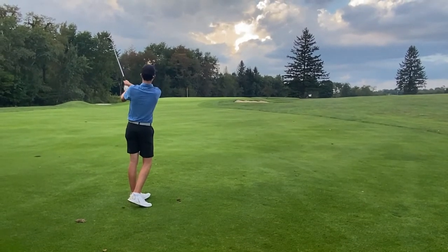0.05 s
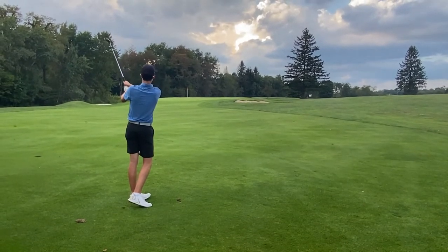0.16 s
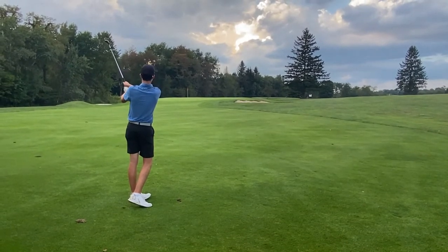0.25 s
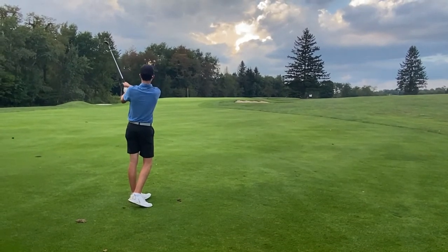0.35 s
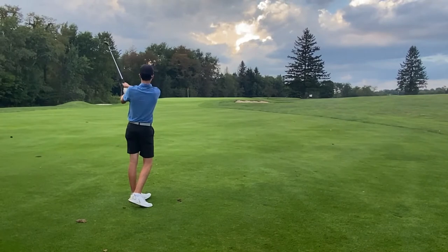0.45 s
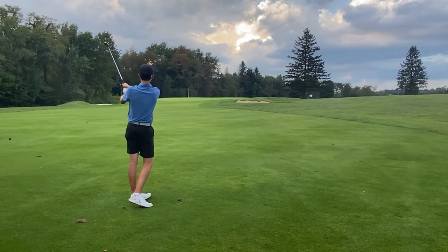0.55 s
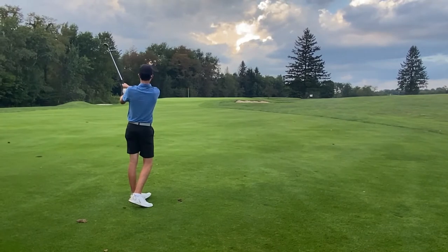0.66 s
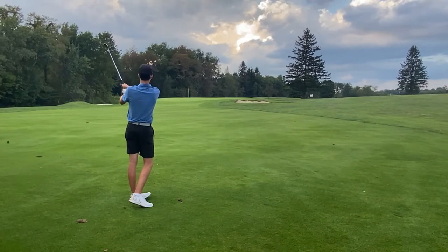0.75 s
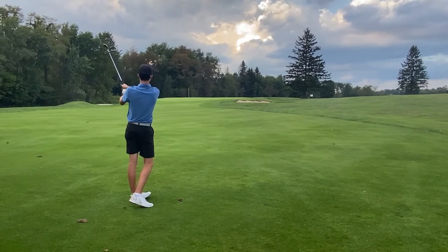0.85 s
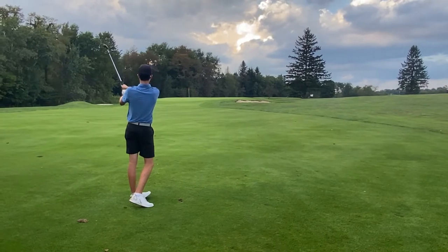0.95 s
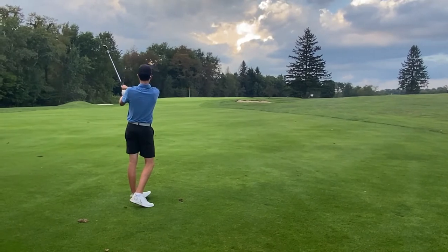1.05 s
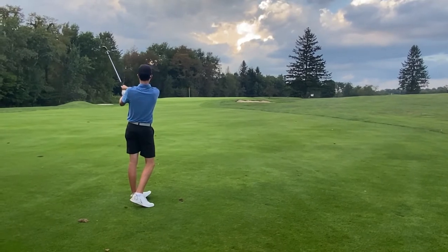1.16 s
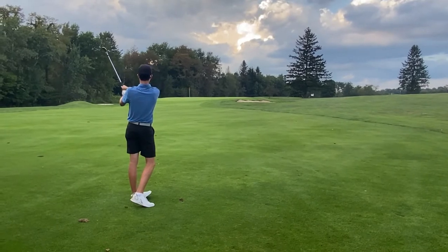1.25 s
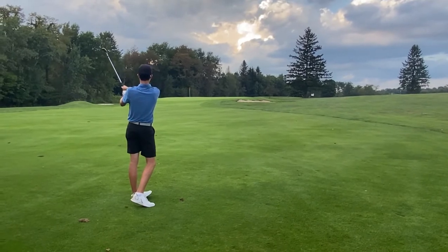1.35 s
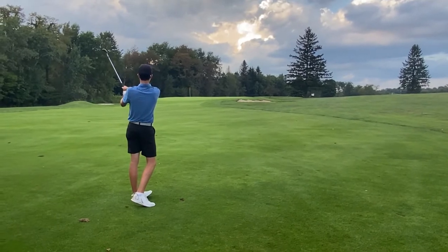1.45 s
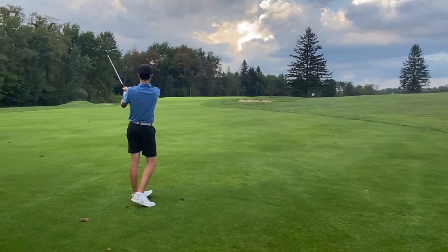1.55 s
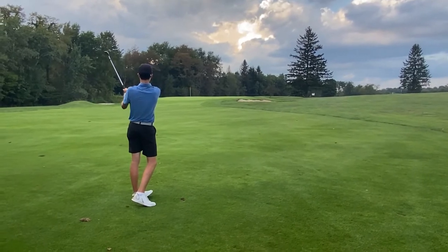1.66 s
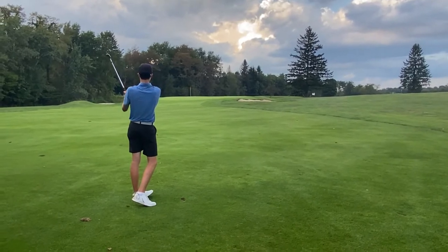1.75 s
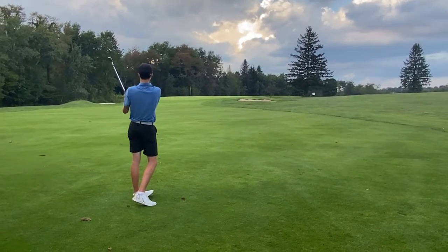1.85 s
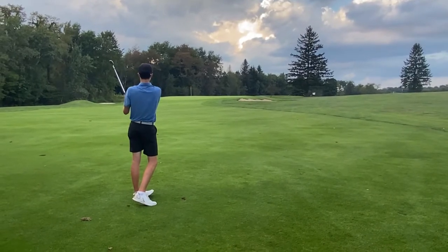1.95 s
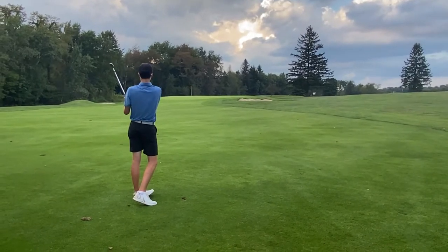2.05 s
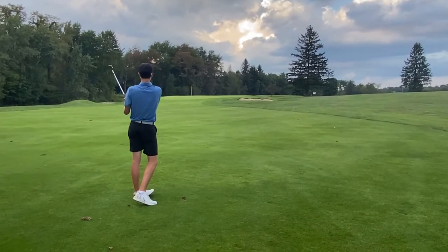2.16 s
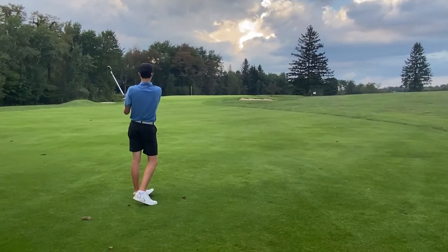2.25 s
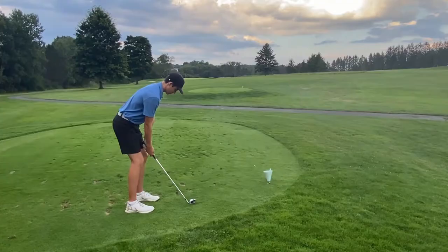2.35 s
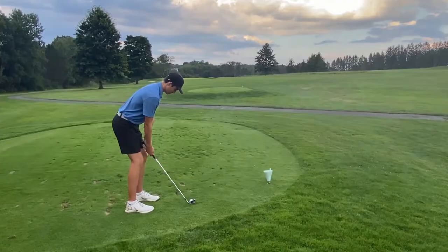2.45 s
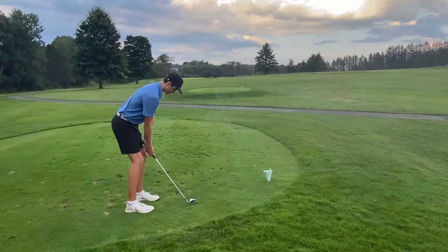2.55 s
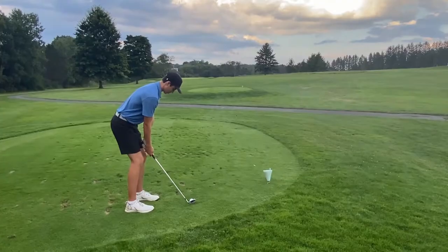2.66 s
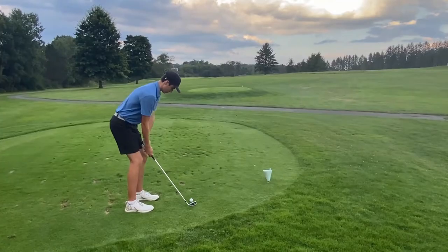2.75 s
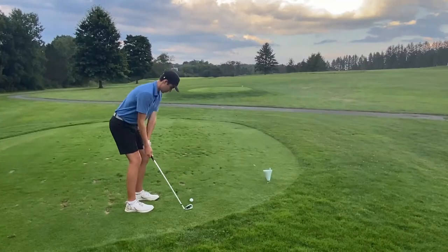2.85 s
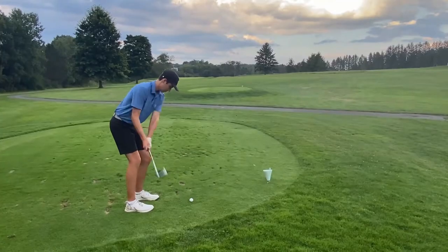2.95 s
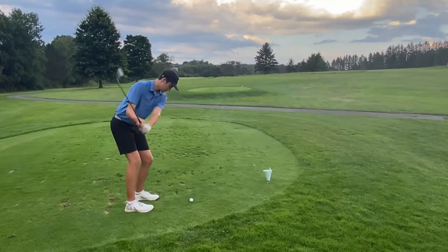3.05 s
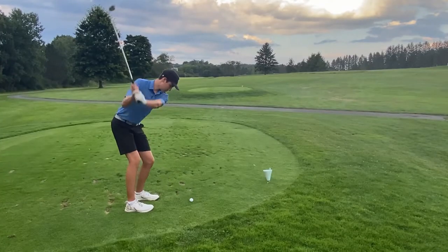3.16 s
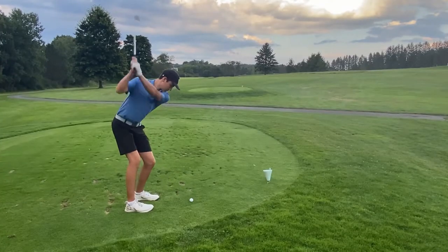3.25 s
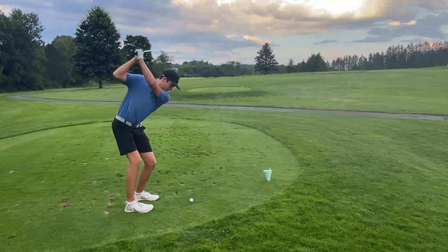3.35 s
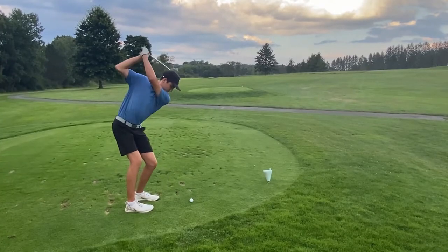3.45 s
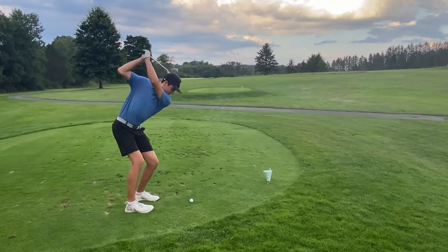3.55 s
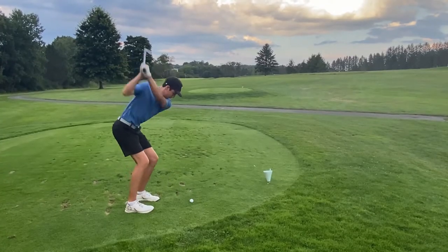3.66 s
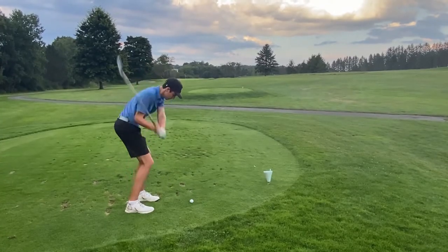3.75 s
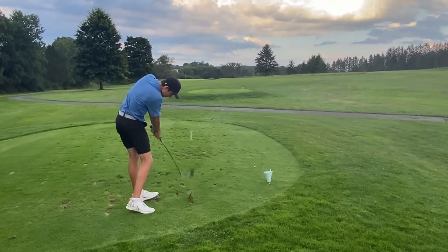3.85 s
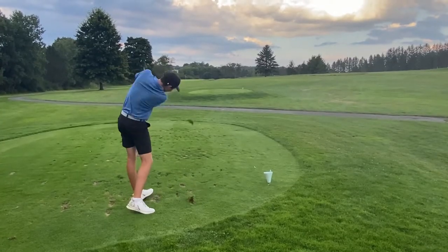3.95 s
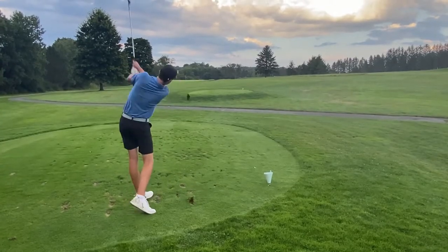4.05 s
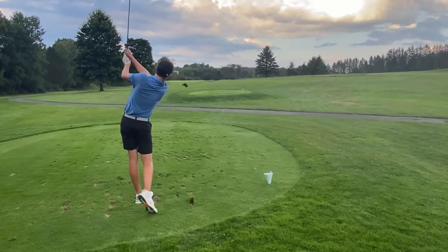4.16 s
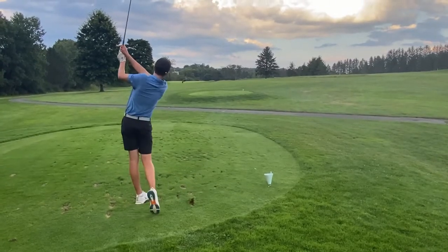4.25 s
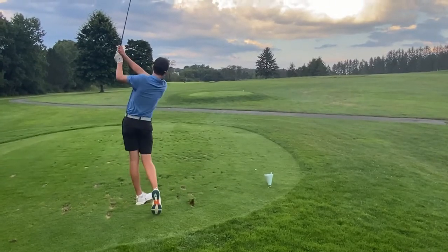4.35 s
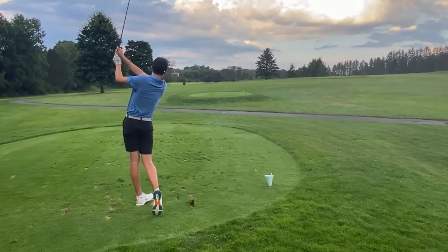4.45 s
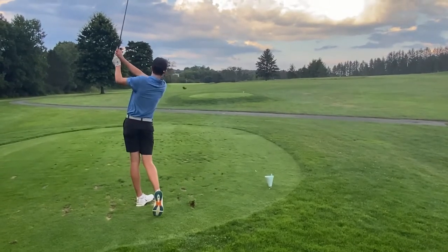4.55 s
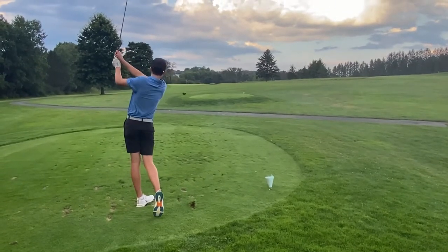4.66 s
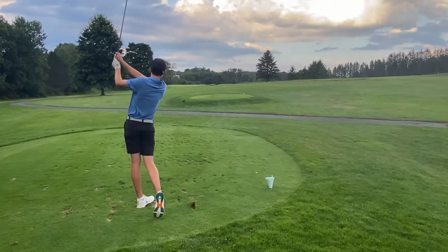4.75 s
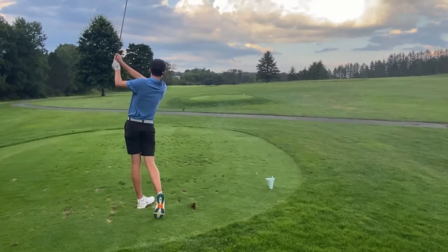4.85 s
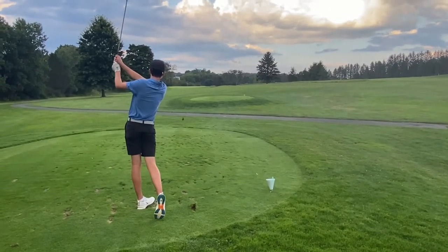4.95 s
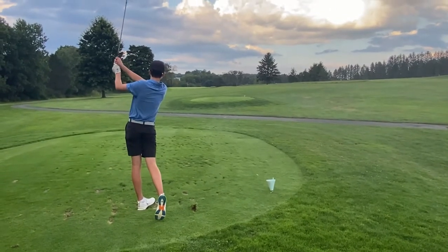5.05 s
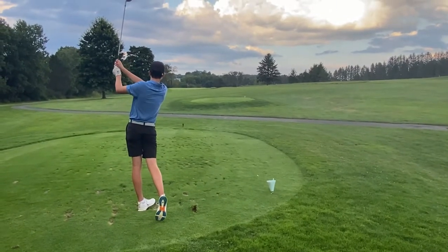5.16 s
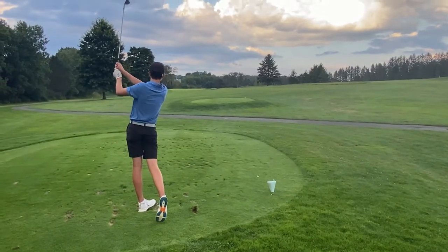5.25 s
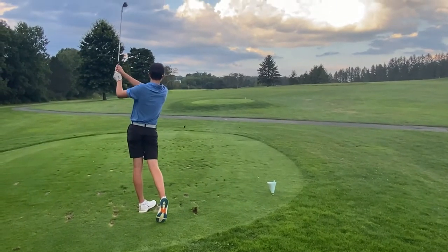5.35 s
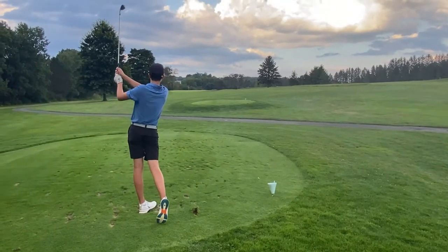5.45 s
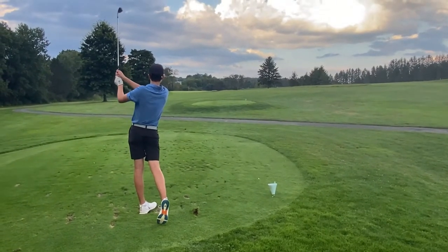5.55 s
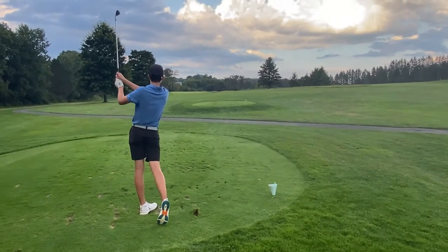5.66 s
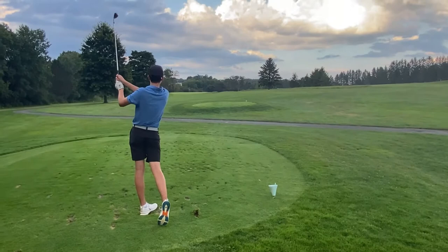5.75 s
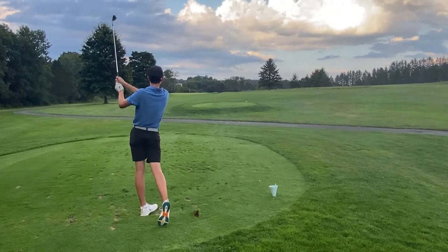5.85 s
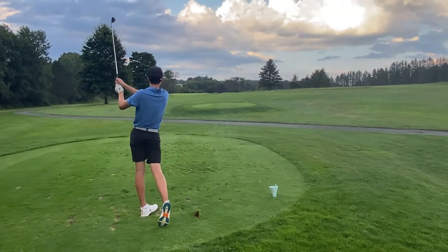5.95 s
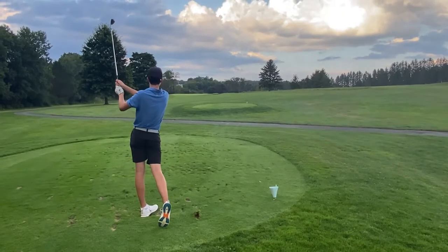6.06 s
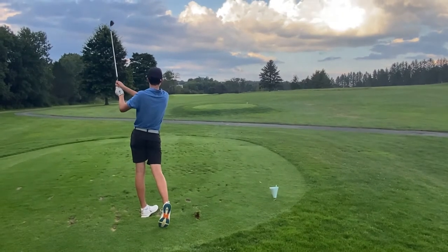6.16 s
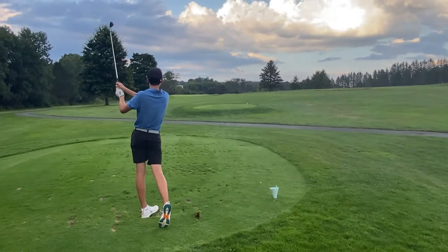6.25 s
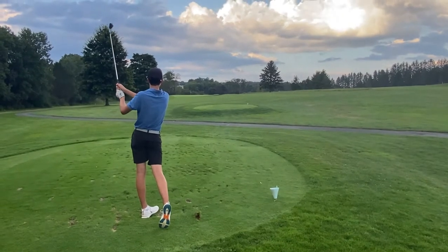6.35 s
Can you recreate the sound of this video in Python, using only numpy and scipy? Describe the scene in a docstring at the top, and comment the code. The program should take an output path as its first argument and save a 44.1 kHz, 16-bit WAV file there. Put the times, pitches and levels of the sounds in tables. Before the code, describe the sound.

Crickets chirp faintly on a golf course over a low rumble of far traffic, light breeze and a distant droning engine. The background dips for an instant and returns without the engine. Then a golf iron swishes down and hits a ball with one loud, sharp crack, and bits of soil patter briefly on the grass. The insects and rumble carry on, picked up in stereo by a phone near the golfer.

```python
"""A golf iron swishes down, cracks a ball and throws up turf whose soil patters on the grass. Swirling air
makes the swish; the blow sets ball and club ringing. This is the second of two moments at dusk, joined by a
short fade. In the first, a distant engine drones with its steady firing. Crickets chirp by rubbing their wings,
and far traffic, a breeze and an insect chorus fill both moments, and a phone with two microphones hears it all."""
import sys
import numpy as np
from scipy import signal
from scipy.fft import rfft, irfft, next_fast_len
from scipy.io import wavfile
from scipy.ndimage import uniform_filter1d

SR = 44100
rng = np.random.default_rng(int(sys.argv[2]) if len(sys.argv) > 2 else 0)


def store_wav(level_fs):
    """Save 16-bit WAV to argv[1]."""
    pcm = np.round(np.clip(np.atleast_2d(level_fs), -1, 1) * 32767)
    wavfile.write(sys.argv[1], SR, pcm.T.astype(np.int16))


N = 282681
TIME = np.arange(N) / SR
SIZE = next_fast_len(N + 4096)
FREQ = np.maximum(np.fft.rfftfreq(SIZE, 1 / SR), 1.)
JOIN_S, STRIKE_S = 2.417, 3.90545  # the fairway gives way to the tee; the club meets the ball


def undb(db):
    """Turn a level in dB into a gain."""
    return 10 ** (np.asarray(db) / 20)


def unit(x):
    """Scale a sound to an average power of 1."""
    return x / np.sqrt(np.mean(x ** 2))


def curves(table):
    """Join a table's points with straight lines in time, one curve per column."""
    times, *columns = np.transpose(table)
    return [np.interp(TIME, times, c) for c in columns]


def over_hz(table, column=1):
    """Join a table's points smoothly from low to high frequency."""
    return np.interp(np.log(FREQ), np.log([r[0] for r in table]), [r[column] for r in table])


def shape(x, gain):
    """Filter a sound with one gain per frequency."""
    return irfft(rfft(x, SIZE) * gain, SIZE)[..., :N]


def walk(rate):
    """A smooth random wobble, about 1 in size, with rate new values a second."""
    hold = int(SR / rate)
    steps = np.repeat(rng.standard_normal(N // hold + 1), hold)
    return 1.3 * uniform_filter1d(uniform_filter1d(steps, hold), hold)[:N]


def sine(hz):
    """A pure tone that follows a changing pitch."""
    return np.sin(2 * np.pi * np.cumsum(hz) / SR)


def bump(at_s, width_s):
    """A bell-shaped swell in time, 1 at its top."""
    return np.exp(-.5 * ((TIME - at_s) / width_s) ** 2)


def decay(age, ring_s):
    """A level that falls by 60 dB every ring_s seconds."""
    return np.exp(-np.log(1000) * age / ring_s)


def wide_noise():
    """Spectra of left and right noise, alike in the bass and unrelated in the treble."""
    # how the two sides compare: f/Hz, likeness/0-1, left minus right/dB
    width = [(61, 1, 0.5), (200.2, 1, 0), (406, 0.4, 2), (700, 0, 6), (1300, 0, 2), (4410, 0.03, 0.5),
             (7905, .05, -1)]
    mid, side = rfft(rng.standard_normal((2, N)), SIZE)
    like, pan_db = np.clip(over_hz(width), 0, .95), over_hz(width, column=2)
    mid, side = mid * np.sqrt((1 + like) / 2), side * np.sqrt((1 - like) / 2)
    return np.array([(mid + side) * undb(pan_db / 2), (mid - side) * undb(-pan_db / 2)])


def place(x, pan_db, lag):
    """Send a sound to both microphones; the left gets it pan_db louder and lag samples later."""
    left = shape(x, np.exp(-2j * np.pi * FREQ * lag / SR))
    return np.array([left * undb(pan_db / 2), x * undb(-pan_db / 2)])


def traffic_and_breeze():
    """Far traffic and breeze blur into noise; rumble and roar swell apart, and each octave flickers."""
    # tone colour of the background at the fairway and at the tee: f/Hz, relative level/dB
    fairway_colour = [(15, -46), (25, -9.5), (72, -4), (102, -12), (120, -12.5), (146, -14), (196, -15),
                      (333, -27.5), (510, -34), (763, -36.5), (1670, -43), (4000, -51.5), (5200, -84),
                      (8800, -120)]
    tee_colour = [(15, -39), (25, -12.5), (60, 0), (131, 1.5), (173, -11), (232, -6.5), (294, -17),
                  (355, -17), (421, -25.5), (560, -27), (720, -24), (850, -28.5), (1030, -25), (1250, -31),
                  (1780, -37), (4000, -46.5), (5200, -82.5), (8800, -120)]
    # slow swells: t/s, rumble/dB, road roar/dB
    swells = [(0.0, 2, 4.5), (0.8, 3.5, 3.5), (1.9, 2, 6), (2.15, 7.5, 4), (2.46, 0, 6.5), (2.7, 1, 2),
              (3.75, 2, 3.5), (4.0, 5.5, 12), (4.35, 4, 6), (4.68, 6.5, 4), (4.9, 1, 4.5), (5.22, -1.5, 5),
              (5.48, -2.5, 8), (5.78, 0, 7), (6.02, 0, 8), (6.22, -1, 7.5), (6.41, 0, 8)]
    rumble_db, roar_db = curves(swells)
    noise, out = wide_noise(), 0
    for hz in 31.25 * 2. ** np.arange(8):
        octave = noise * np.cos(np.pi / 2 * np.clip(np.log2(FREQ / hz), -1, 1)) ** 2
        fairway = irfft(octave * undb(over_hz(fairway_colour) - 28.5), SIZE)[:, :N]
        tee = irfft(octave * undb(over_hz(tee_colour) - 33), SIZE)[:, :N]
        swell_db = rumble_db if hz < 300 else roar_db if hz < 1500 else 0
        out += np.where(TIME > JOIN_S, tee, fairway) * undb(swell_db + 1.5 * walk(8.7))
    return out


def engine():
    """Tones at multiples of the firing rate waver on their long way through the air."""
    # the engine's run: t/s, firing rate/Hz, level/dB
    firing = [(0.0, 91.7, -51.5), (0.45, 92.3, -49), (0.7, 92.65, -44), (0.95, 95.4, -46.5),
              (2.15, 95.2, -49.5), (2.41, 95.3, -61)]
    # its tones: multiple of the firing rate, relative level/dB
    harmonics = [(1, -0.5), (2, -12), (3, -23.5), (4, -29), (5, -33.5)]
    # a second, rougher drone above it: t/s, f/Hz, level/dB
    second_drone = [(0.0, 126, -56.5), (0.3, 123, -62.5), (0.6, 124, -59.5), (0.85, 126, -69.5),
                    (1.3, 130, -64), (1.9, 130, -63), (2.25, 131, -56), (2.4, 131, -60)]
    hz, db = curves(firing)
    cycles = np.cumsum(hz * (1 + .0028 * walk(11.67))) / SR
    tone = 0
    for k, tone_db in harmonics:
        waver_db = (1.8 if k == 1 else 4) * walk(5.74)
        tone += undb(tone_db + waver_db) * np.sin(2 * np.pi * (k * cycles + rng.random()))
    drone_hz, drone_db = curves(second_drone)
    drone = undb(drone_db + 4 * walk(8.1)) * sine(drone_hz * (1 + .0157 * walk(15)))
    return place(np.sqrt(2) * (tone * undb(db) + drone) * (TIME < JOIN_S), pan_db=-1.4, lag=-45)


def insect_chorus():
    """Many far insects blur into bands of hiss that trill and drift."""
    # edges of each band: low f/Hz, high f/Hz
    edges = [(3280, 3500), (4540, 4850), (4900, 5400), (5400, 5850), (6200, 6800), (6800, 7100),
             (7100, 7550), (4250, 8050), (9600, 12400)]
    # each band's sound: fairway level/dB, tee level/dB, trill rate/Hz, trill depth/0-1
    voices = [(-98.5, -104, 8, 0.5), (-78, -87, 33, 0.2), (-85, -82, 66, .25), (-84.5, -81.5, 68, 0.07),
              (-100.5, -86.5, 27, .2), (-99, -86.5, 48, 0.1), (-91.5, -91, 59, 0.1),
              (-88.5, -86.5, 20, .05), (-95.5, -94, 39.2, .1)]
    noise, out = wide_noise(), 0
    for (low_hz, high_hz), (fairway_db, tee_db, rate, depth) in zip(edges, voices):
        band = 1 / np.sqrt((1 + np.minimum(low_hz / FREQ, 9) ** 60) * (1 + (FREQ / high_hz) ** 60))
        hiss = unit(irfft(noise * band, SIZE)[:, :N])
        trill = 1 + depth * sine(rate * (1 + .067 * walk(4.7)))
        out += hiss * trill * undb(np.where(TIME > JOIN_S, tee_db, fairway_db) + .94 * walk(5.1))
    return out


def crickets():
    """Each wing stroke is a short raspy tone that falls in pitch; no two strokes are quite alike."""
    # single insects: f/Hz, level/dB, stroke rate/Hz, sounding share of a stroke/0-1,
    # pitch fall in a stroke/Hz, left minus right/dB, relative level as a call starts/dB
    singers = [(2370, -86, 48.5, 1, 30, 2., -3), (5270, -73.5, 24.8, .42, 250, 0., -4),
               (6950, -92, 24.15, .45, 200, -2., 0), (6480, -79.5, 13.38, .35, 600, -1., 0),
               (4550, -83, 62, 1, 350, 0., -5), (2670, -89, 67, .9, 240, 1., -3),
               (2970, -94, 55, .9, 200, 1., -5), (2190, -89.5, 48, 1, 70, 1., -4),
               (3330, -92.5, 60, .9, 350, 1., -5), (2870, -93, 60, .9, 350, 1., 0)]
    # one list of calls per insect: start t/s, length/s
    songs = [
        [(0., .045), (.312, .11), (.672, .165), (1.115, .11), (1.465, .175), (1.915, .095), (2.255, .155)],
        [(s, .12) for s in (.147, .42, .735, 1.148, 1.528, 1.797, 2.09)],
        [(.017, 2.39)],
        [(2.468, 1.9), (4.391, 2.02)],
        [(s, .115) for s in (2.465, 4.67, 5.2, 5.76)],
        [(2.57, .2), (2.8, .39), (3.23, .11)],
        [(2.85, .22), (3.39, .12)],
        [(3.59, .16)],
        [(5.63, .2)],
        [(4.51, .07), (4.67, .05), (4.77, .14), (4.99, .12)],
    ]
    swell_s, jitter_s, spread_db = .045, .002, 1.4
    out, rasp = np.zeros((2, N)), .3 * walk(640)
    uneven_time = TIME + jitter_s * walk(40)
    for (hz, db, rate, share, fall_hz, pan_db, start_db), calls in zip(singers, songs):
        for start, length in calls:
            call = slice(int(start * SR), min(int((start + length) * SR), N))
            stroke, progress = np.divmod(np.maximum(uneven_time[call] - start, 0) * rate, 1)
            strength, phase = rng.standard_normal((2, 99))[:, stroke.astype(int)]
            progress = np.minimum(progress / share, 1)
            cycles = np.cumsum(hz + fall_hz * (.5 - progress + rasp[call])) / SR + .1 * phase
            swell_db = start_db * np.exp(-stroke / rate / swell_s)
            arch = np.sin(np.pi * progress).clip(0) ** .6
            tone = undb(db + swell_db + spread_db * strength) * arch * np.sin(2 * np.pi * cycles)
            out[:, call] += 2 * tone * undb([[pan_db / 2], [-pan_db / 2]])
    # grass and leaves scatter the tones, which blurs and roughens the strokes
    scatter = rng.standard_normal((2, 4096)) * decay(TIME[:4096], ring_s=.045)
    scatter /= np.sqrt(np.sum(scatter ** 2, axis=1, keepdims=True))
    return out + undb(-10) * shape(out, rfft(scatter, SIZE))


def rustle():
    """A faint, uneven, very high hiss comes and goes before the swing."""
    treble = wide_noise() / (1 + (10500 / FREQ) ** 12) / (1 + (FREQ / 15000) ** 40)
    hiss = unit(irfft(treble, SIZE)[:, :N])
    return hiss * bump(at_s=3.338, width_s=.1) * undb(-90 + 2 * walk(40))


def swing():
    """Air swirls off the club with a rush; faster swirls sound higher, and the shaft sings briefly."""
    # the club head's flight: t/s, speed/(m/s), level of the rush/dB
    flight = [(3.75, 18.6, -83), (3.815, 28.7, -70.5), (3.835, 33, -59.5), (3.855, 33, -49),
              (3.874, 33, -41), (3.892, 39.5, -43), (3.905, 47, -40.5), (3.96, 30, -62.5), (4.1, 24, -71)]
    # rough tones in the rush: multiple of the swirl rate, relative level/dB
    swirl_tones = [(1, 4), (2, -2), (3.7, -6.5)]
    speed, rush_db = curves(flight)
    shaft_m = .012
    swirl_hz = .2 * speed / shaft_m  # one swirl for every five shaft widths travelled
    colour = (FREQ / 500) / (1 + (FREQ / 500) ** 2) ** .95 / (1 + (FREQ / 7000) ** 2)
    rush = unit(shape(rng.standard_normal(N), colour))
    singing = sine(swirl_hz * (1 + .03 * walk(120))) * undb(-31 + 1.5 * walk(70))
    singing *= bump(at_s=3.89, width_s=.0065)
    rush += undb(-3) * sum(undb(db) * walk(250) * sine(k * swirl_hz) for k, db in swirl_tones)
    # a thin falling whistle as the club comes down
    whistle_s, whistle_hz, fall_hz_per_s = 3.79, 3520, 7000
    t = TIME - whistle_s
    whistle = np.sin(2 * np.pi * (whistle_hz - fall_hz_per_s * t / 2) * t)
    whistle *= undb(-81 + 5 * walk(150)) * bump(whistle_s, width_s=.04)
    moving = (TIME > flight[0][0]) & (TIME < flight[-1][0])
    return place(moving * (rush * undb(rush_db) + singing) + whistle, pan_db=3, lag=-5)


def strike():
    """A hard blow rings ball and club with a crack; a weaker, duller echo bounces off the ground."""
    # ringing tones of the blow: f/Hz, relative level/dB, time to fall 60 dB/s
    tones = [(62, -31, .2), (110.17, -19, 0.051), (173, -14, 0.057), (348, -14, 0.023), (560, -18, 0.022),
             (1073.3, -9.5, 0.018), (1480, -14, 0.013), (1975, -4, 0.014), (2760, -13, 0.011),
             (3480, -6.5, .011), (3900, -6.5, .01), (4220, -6.5, 0.012), (4600, -8, 0.011),
             (5350, -14, .008), (6200, -13, 0.006), (7070, -9, .007), (7450, -9, .006), (7800, -12, 0.006),
             (9450, -10, 0.005), (11500, -7, 0.004), (13000, -4, 0.0035), (14400, -6, 0.0035),
             (15200, -15, .003), (785, -25, .02)]

    def ring(age):
        return sum((-1) ** k * undb(db) * decay(age, ring_s) * np.sin(2 * np.pi * hz * age)
                   for k, (hz, db, ring_s) in enumerate(tones))

    def crack(age):
        return rng.standard_normal(N) * decay(age, ring_s=.018) * (age > 0)

    ball_age = np.maximum(TIME - STRIKE_S, 0)
    echo_age = np.maximum(ball_age - .0025, 0)
    ball = ring(ball_age) + undb(-11.5) * crack(ball_age)
    dull_ring = shape(ring(echo_age), 1 / (1 + (FREQ / 3500) ** 2))
    ground_echo = undb(-13) * dull_ring + undb(-17) * crack(echo_age)
    blow = undb(-2.5) * (ball + ground_echo)
    thud = shape(blow, 1 / (1 + (FREQ / 450) ** 4))
    treble = shape(blow, 1 / (1 + (5500 / FREQ) ** 14))
    # the left microphone hears the body of the blow first, but its treble late and flipped, round the phone
    body = place(thud, pan_db=-.4, lag=-3.7) + place(blow - treble - thud, pan_db=1.7, lag=-3.7)
    return body + place(treble, pan_db=-.5, lag=10.2) * [[-1], [1]]


def divot():
    """Torn turf and soil land as tiny clicks spread over the grass; each shower rises, then dies away."""
    # showers of soil: start t/s, peak level/dB, rise time/s
    showers = [(3.906, -51, 0.009), (3.93, -46.5, 0.0069), (3.95, -60.5, 0.0343), (4.02, -57.5, 0.053),
               (4.11, -67.5, 0.1)]
    # tone colour of the patter: f/Hz, relative level/dB
    soil = [(400, -24.5), (1000, -6.5), (2680, -3.5), (3580, -9), (4360, -5), (5440, -14.5), (6940, -4.5),
            (9060, -20), (11300, -14.5), (16000, -23.5)]
    power = 0
    for start, db, rise_s in showers:
        age = np.maximum(TIME - start, 0) / rise_s
        power += (undb(db) * age * np.exp(1 - age)) ** 2
    thinning_s, spread_db = .15, 2.2
    grains_per_s = 1630 + 7300 * np.exp(-np.maximum(TIME - STRIKE_S, 0) / thinning_s)
    chance, size, sign = rng.random((3, 2, N))
    strength = undb(-spread_db * np.log(size + 1e-9)) / np.sqrt(grains_per_s)
    grains = (chance < grains_per_s / SR) * strength * np.sign(sign - .5)
    # bigger crumbs land one by one within a second, each with a short pitch of its own
    crumbs, t = np.zeros((2, N)), TIME[:512]
    low_hz, high_hz = 600, 7500
    for delay_s, pitch, weight, pan in rng.random((800, 4)):
        hz = low_hz * (high_hz / low_hz) ** pitch
        age = t * hz / 12  # a crumb dies away in about 12 cycles
        tick = (.3 + weight) * np.sqrt(hz) * age * np.exp(-8 * age) * np.sin(2 * np.pi * hz * t)
        first = int((STRIKE_S + delay_s) * SR)
        crumbs[:, first:first + len(t)] += np.outer([pan, 1 - pan], tick)
    colour = undb(over_hz(soil))
    patter = unit(shape(grains, colour)) + undb(-5) * unit(shape(crumbs, colour)) / np.sqrt(N / SR)
    return np.sqrt(power) * patter


def scene():
    """Add up all sources; the background fades out and back in between the two moments."""
    fade_s = .032
    fade = np.clip(np.abs(TIME - JOIN_S) / fade_s, 0, 1) ** 1.8
    background = traffic_and_breeze() + engine() + insect_chorus() + crickets() + rustle()
    return fade * background + swing() + strike() + divot()


def record(dry):
    """The phone delays the bass, drops the deepest rumble, rounds the loudest peak and cuts the top."""
    lag_s, bass_hz, rumble_hz, top_hz, ceiling = .0072, 306, 30, 15900, .95
    late_bass = np.exp(-2j * np.pi * lag_s * bass_hz * np.log(1 + FREQ / bass_hz))
    filtered = shape(dry, late_bass / np.sqrt(1 + (rumble_hz / FREQ) ** 6))
    rounded = ceiling * np.tanh(filtered / ceiling)
    return signal.sosfilt(signal.ellip(12, .3, 110, top_hz, fs=SR, output="sos"), rounded)


dry = scene()
out = record(dry)
store_wav(out)
```